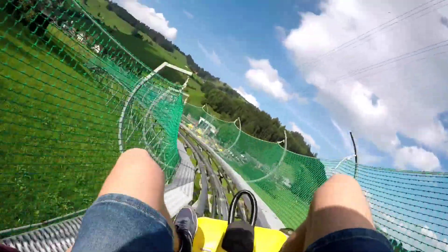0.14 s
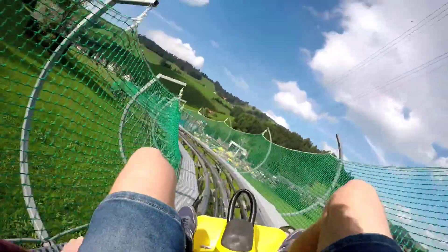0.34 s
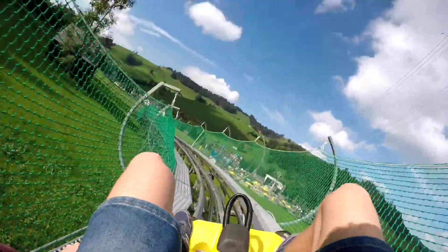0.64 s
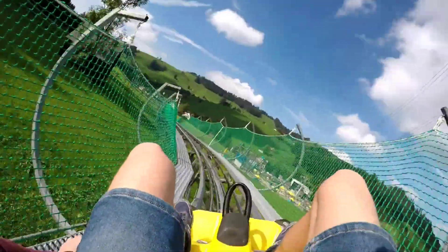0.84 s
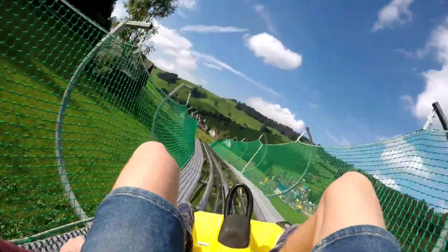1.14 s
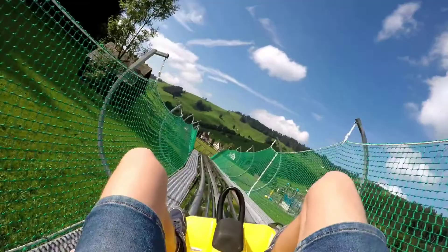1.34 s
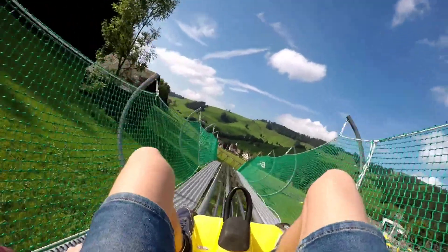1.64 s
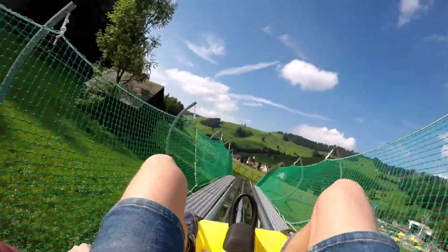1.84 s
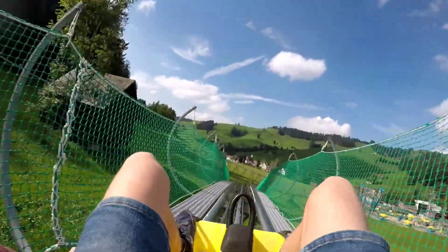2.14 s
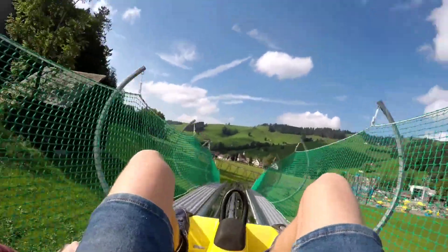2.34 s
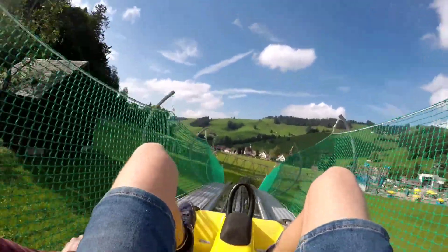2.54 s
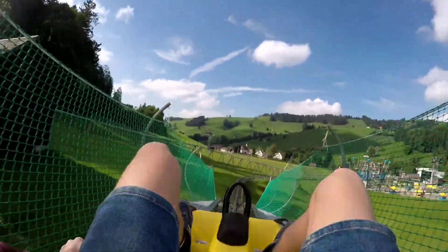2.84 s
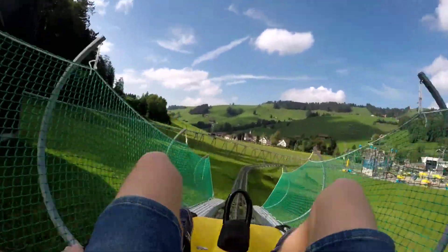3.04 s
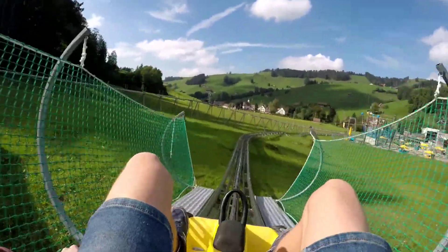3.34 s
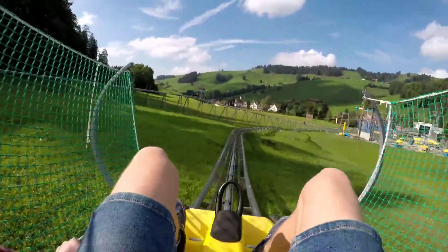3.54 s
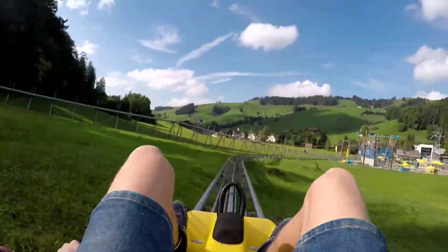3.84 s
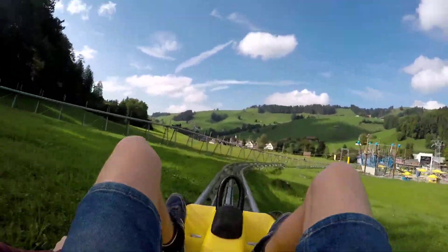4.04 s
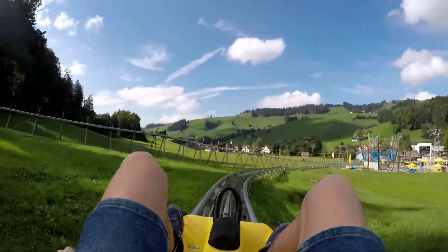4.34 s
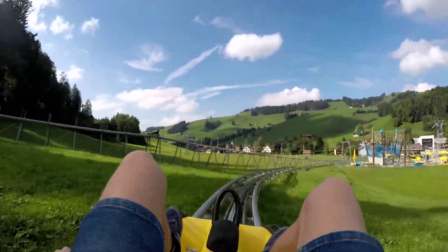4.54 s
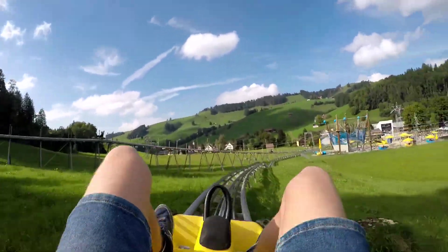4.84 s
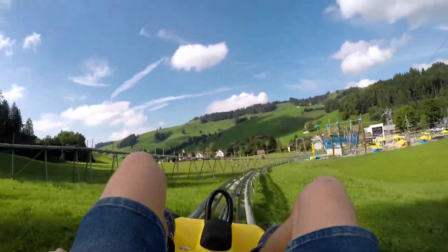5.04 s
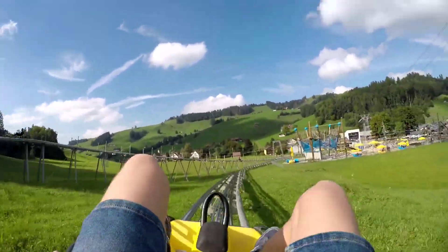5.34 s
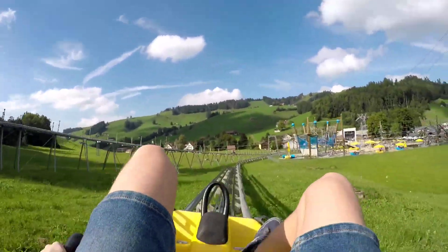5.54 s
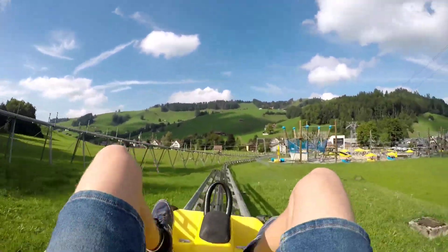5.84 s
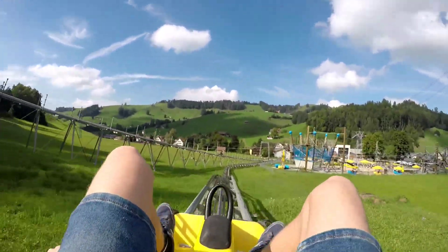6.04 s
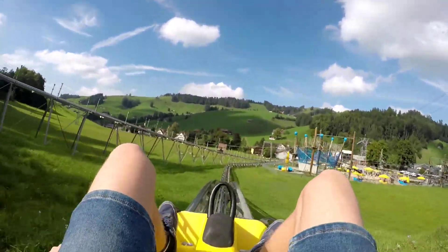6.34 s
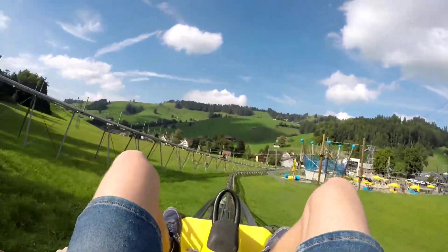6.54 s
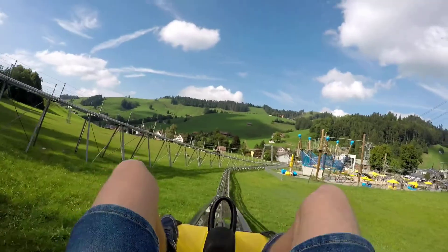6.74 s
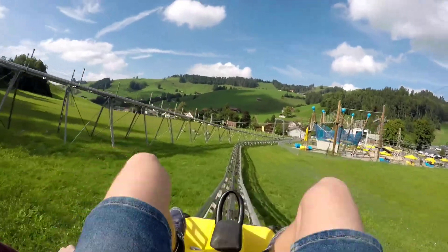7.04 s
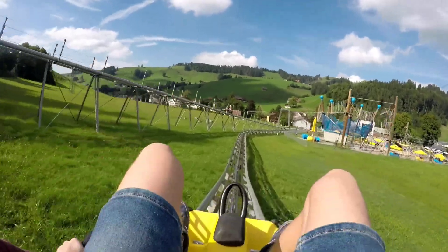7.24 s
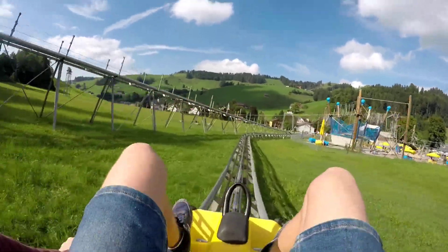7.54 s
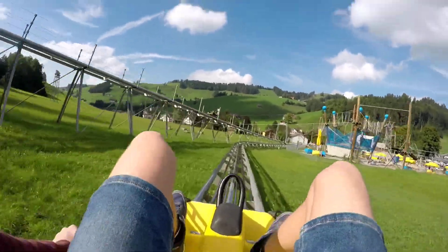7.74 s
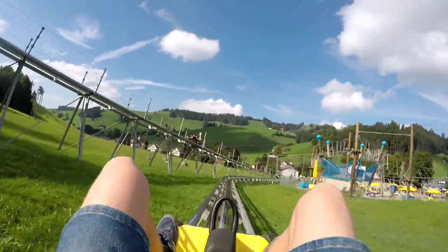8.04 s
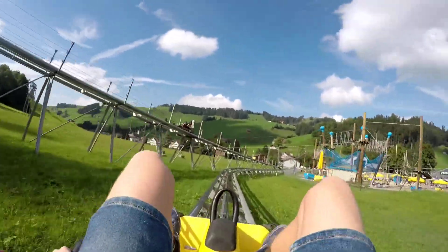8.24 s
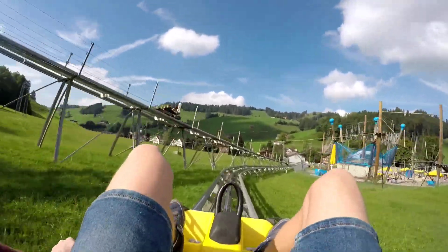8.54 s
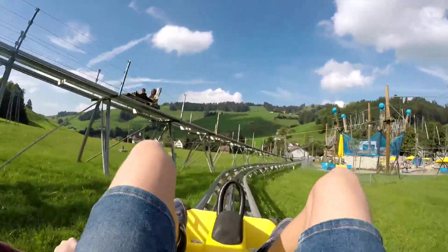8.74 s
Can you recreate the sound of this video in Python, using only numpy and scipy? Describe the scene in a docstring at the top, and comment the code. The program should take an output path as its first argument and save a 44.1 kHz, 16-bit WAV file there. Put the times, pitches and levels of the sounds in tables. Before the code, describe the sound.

An onboard microphone in open air catches a plastic-bodied sled racing over a tubular steel track. The uneven rumble swells with every rough stretch, with wavering booms, fine rattling and thin hiss on top. Quick wheel taps build before a cluster of knocks and scuffs at about three seconds; scattered clacks and heavy bumps carry on to the end under low wind thuds.

```python
"""A heavy jolt booms at once under a drumming, rattling ride: a coaster sled on a steel tube track, from the seat.
Random wheel contacts drum through resonances of frame and plastic shell; loose fittings chatter and knock
as filtered contacts and struck modes. Guide wheels scuff, hiss and squeak as filtered noise, the tube rings,
a wheel taps on every turn, and shaped noise makes the airstream that buffets the microphone."""
import sys
import numpy as np
from scipy import signal
from scipy.fft import rfft, irfft
from scipy.io import wavfile
from scipy.ndimage import uniform_filter1d

SR = 44100
rng = np.random.default_rng(int(sys.argv[2]) if len(sys.argv) > 2 else 0)


def store_wav(level_fs):
    """Save 16-bit WAV to argv[1]."""
    pcm = np.round(np.clip(np.atleast_2d(level_fs), -1, 1) * 32767)
    wavfile.write(sys.argv[1], SR, pcm.T.astype(np.int16))


N = 392490

# ringing modes of the loose fittings: pitch_hz [Hz], relative level_db [dB], t60_s [s]
FITTING_MODES = [(571, 7.5, 0.015), (725, 4.5, 0.015), (1048, -7, 0.04), (1296, 3, 0.014), (1523, 5, 0.012),
                 (1686, -4.5, 0.0087), (1903, -6.5, 0.022), (2670, -2, 0.0071)]
# colour of friction and cracks on steel: frequency_hz [Hz], relative density_db [dB per Hz]
STEEL_COLOUR = [(500, 12), (4500, 0.5), (5700, -5), (7500, -6.5), (10000, -16), (11500, -27.5),
                (15000, -40.5)]


def from_db(db):
    """Decibels to gain."""
    return 10 ** (np.asarray(db) / 20)


def rms_one(x):
    """Scale to an rms of one."""
    return x / np.sqrt(np.mean(x ** 2) + 1e-20)


def peak_one(x):
    """Scale to a peak of one."""
    return x / (np.abs(x).max() + 1e-20)


def in_time(rows):
    """Draw each column of a breakpoint curve at every sample."""
    s, *columns = np.transpose(rows)
    return [np.interp(np.arange(N) / SR, s, column) for column in columns]


def add(out, s, sound):
    """Mix a sound in, starting at second s."""
    at = int(np.clip(s * SR, 0, N - 1))
    out[at:at + len(sound)] += sound[:N - at]


def drift(rate_hz):
    """Random movement with an rms of one, weaker above rate_hz."""
    hz = np.arange(N // 2 + 1) * SR / N
    spectrum = rfft(rng.standard_normal(N)) / (1 + (hz / rate_hz) ** 2)
    return rms_one(irfft(spectrum, N))


def colour(x, spectrum, size=16384):
    """Causal (minimum-phase) filter that follows a spectrum; white noise keeps its level."""
    hz, db = np.transpose(spectrum)
    grid = np.maximum(np.arange(size // 2 + 1) * SR / size, 1)
    cepstrum = irfft(np.log(from_db(np.interp(np.log(grid), np.log(hz), db))))
    # folding the cepstrum forward in time gives the minimum phase
    folded = 2 * cepstrum[:size // 2] * (np.arange(size // 2) > 0)
    response = irfft(np.exp(rfft(folded, size)))
    return signal.fftconvolve(x, response / np.linalg.norm(response))[:N]


def resonate(x, hz, width_hz):
    """One resonance with a gain of one on top."""
    r = np.exp(-np.pi * width_hz / SR)
    zeros = np.array([1, 0, -1]) * (1 - r * r) / 2
    poles = [1, -2 * r * np.cos(2 * np.pi * hz / SR), r * r]
    return signal.lfilter(zeros, poles, x)


def band(x, low_hz, high_hz):
    """Band-pass."""
    edges = [low_hz, min(high_hz, SR / 2 - 1)]
    return signal.sosfilt(signal.butter(2, edges, "band", fs=SR, output="sos"), x)


def ring(t, hz, t60):
    """A struck mode: a sine that falls 60 dB in t60 seconds."""
    return np.sin(2 * np.pi * hz * t) * from_db(-60 * t / t60)


def contacts(per_s, spread_db):
    """Random small impacts of uneven size and either sign; rms one."""
    sizes = from_db(spread_db * np.minimum(rng.standard_normal(N), 2))
    signed = sizes * rng.choice([-1, 1], N)
    return rms_one(signed * (rng.random(N) < per_s / SR))


def steadied(x, span_s):
    """Even out slow swells and keep the quick ones."""
    power = np.abs(uniform_filter1d(x * x, int(span_s * SR) + 1))
    return x / np.sqrt(power + 1e-6)


def drummed(road, resonances, low_hz, high_hz):
    """A body shaken by the wheels answers in its resonances."""
    body = sum(from_db(db) * resonate(road, hz, width) * (-1) ** k
               for k, (hz, width, db) in enumerate(resonances))
    return steadied(band(body, low_hz, high_hz), span_s=0.23)


def tube_ring(friction, ring_db, width_hz):
    """Friction stirs the close, narrow modes of the steel tube."""
    # modes of the tube: pitch_hz [Hz]
    tube_modes = [2950, 3202, 3458, 3573, 3738, 3956, 4133, 4851]
    return friction + from_db(ring_db) * sum(resonate(friction, hz, width_hz) for hz in tube_modes)


def tapped(touch, tap_s):
    """Each touch is a brief chatter with its own mix of the modes of the fittings."""
    taps = signal.lfilter([1], [1, -np.exp(-1 / (tap_s * SR))], touch + 1e-18)
    # a mode that dies in t60 is ln(1000) / (pi t60) wide
    rung = sum(from_db(db) * resonate(taps * rng.standard_normal(N), hz, np.log(1000) / (np.pi * t60))
               for hz, db, t60 in FITTING_MODES)
    soft = signal.sosfilt(signal.butter(6, 1950, fs=SR, output="sos"), rung)
    return band(soft, low_hz=1120, high_hz=2600)


def jolts():
    """Each rough stretch swells, holds and lets go, raising rolling noise and buffeting (dB)."""
    # rough rail: start_s of the hold [s], length_s [s], roll_rise_db [dB],
    # buffet_rise_db [dB; below zero adds nothing]
    rough_stretches = [(0.004, 0.057, 7.5, 14), (0.323, 0.39, 2, 6), (1.198, 0.15, 4, -2.5),
                       (1.819, 0.069, 7, 9), (2.441, 0.55, 4, 6), (3.341, 0.21, 2.5, 8),
                       (3.877, 0.14, 5, 4), (4.642, 0.13, 4.0, 0), (4.864, 0.14, 4.5, 5),
                       (5.22, 0.63, 3, 1.5), (6.07, 0.7, 1.5, 3.5), (6.908, 0.47, 3, 5),
                       (7.858, 0.15, 8, 1.5), (8.465, 0.11, 3, 4)]
    attack_s, release_s = 0.034, 0.028
    t, rises = np.arange(N) / SR, np.zeros((2, N))
    for s, length, roll_db, buffet_db in rough_stretches:
        inside = np.minimum((t - s) / attack_s, (s + length - t) / release_s)
        shape = np.clip(1 + inside, 0, 1)
        rises = np.maximum(rises, np.outer([roll_db, buffet_db], shape))
    return rises


def airstream():
    """Lumpy turbulence at the microphone: deep coloured noise."""
    # turbulence colour: frequency_hz [Hz], relative density_db [dB per Hz]
    wind_colour = [(10, -9.5), (24, 1), (38, -5), (53, -0.5), (70, -6), (95, -8), (150, -28.5),
                   (1500, -95.5)]
    return steadied(colour(rng.standard_normal(N), wind_colour), span_s=0.27)


def rail_hiss(rattle_db, shake):
    """The treads hiss on the steel, more where the ride is rough."""
    # tread noise colour: frequency_hz [Hz], relative density_db [dB per Hz]
    hiss_colour = [(1200, -19.5), (2300, -0.5), (4800, -1), (5600, -9.5), (6600, -3.5), (8200, -6.5),
                   (10200, -15), (11300, -23.5), (15000, -32.5)]
    swell_db = 0.61 * (rattle_db - np.mean(rattle_db)) + 1.1 * shake + 2.15 * drift(24)
    return from_db(-53.0 + swell_db) * colour(rng.standard_normal(N), hiss_colour)


def squeaks():
    """A slipping tread sings for a moment on one narrow mode; the first row is instead the struck tube ringing
    on after the clang."""
    # squeaks: peak_s [s], level_db [dB], pitch_hz [Hz], width_hz [Hz]; the first row is the tube still ringing
    # after the clang
    squeak_rows = [(0.355, -42, 2900, 120), (0.378, -42, 4600, 350), (0.426, -45, 4350, 400),
                   (6.63, -43.5, 4480, 450)]
    half_length_s = 0.02
    out, t = np.zeros(N), np.arange(N) / SR
    for s, db, hz, width in squeak_rows:
        tone = rms_one(resonate(rng.standard_normal(N), hz, width))
        out += from_db(db) * np.exp(-((t - s) / half_length_s) ** 2) * tone
    return out


def scuffs():
    """Grainy friction that swells and dies as a guide wheel slides on the tube."""
    # slides: peak_s [s], relative level_db [dB], rise_s [s], fall_s [s]
    scuff_rows = [(0.26, -29, 0.0067, 0.046), (0.38, -39.5, 0.04, 0.045), (0.69, -45, 0.089, 0.11),
                  (1.3, -39.5, 0.09, 0.098), (2.89, -39, 0.043, 0.044), (3.015, -37, 0.0037, 0.0093),
                  (3.162, -35.5, 0.0054, 0.015), (3.486, -26, 0.005, 0.0098), (3.51, -46, .008, 0.16),
                  (6.63, -50, 0.19, 0.27), (7.366, -42.5, .004, 0.051), (8.0, -50.5, 1, 0.069)]
    t, power = np.arange(N) / SR, np.zeros(N)
    for s, db, rise, fall in scuff_rows:
        away = np.maximum((s - t) / rise, (t - s) / fall)
        power += (from_db(db) * np.exp(-np.minimum(away, 20))) ** 2
    grains = contacts(per_s=8000, spread_db=2.5) * from_db(4.2 * drift(71))
    return np.sqrt(power) * steadied(colour(grains, STEEL_COLOUR), span_s=0.27)


def ticks():
    """Small steel parts touch: a very short burst of bright noise."""
    # ticks: start_s [s], peak_db [dB]
    tick_rows = [(5.057, -20.5)]
    out, t = np.zeros(N), np.arange(SR // 50) / SR
    for s, db in tick_rows:
        burst = rng.standard_normal(len(t)) * np.exp(-t / 0.00065)
        add(out, s, from_db(db) * peak_one(band(burst, low_hz=4240, high_hz=8400)))
    return out


def clang():
    """A hard touch sets the tube ringing: two brief bright modes and a faint one that lingers."""
    # struck modes of the tube: pitch_hz [Hz], relative level_db [dB], t60_s [s]
    clang_modes = [(2960, -16, 0.45), (3240, -1, 0.064), (3580, 3, 0.045)]
    start_s, level_db = 0.2595, -21
    out, t = np.zeros(N), np.arange(SR // 2) / SR
    rung = sum(from_db(db) * ring(t, hz, t60) for hz, db, t60 in clang_modes)
    add(out, start_s, from_db(level_db) * rung * (1 - np.exp(-t / 0.003)))
    return out


def tread_taps(first, second):
    """Two uneven spots, half a turn apart, strike the rail on every turn of the wheel."""
    turns_per_s, level_db = 19.21, -39.5
    touch = np.zeros(N)
    at = np.arange(0, N, SR / turns_per_s / 2).astype(int)
    touch[at[::2]] = first[at[::2]]
    touch[at[1::2]] = second[at[1::2]]
    strength = np.sqrt(np.mean(touch[at] ** 2))
    return from_db(level_db) * strength * rms_one(tapped(touch, tap_s=0.0031))


def clacks(shake):
    """Light taps of the fittings run on all the time, in clusters where the sled shakes."""
    touch = np.abs(contacts(per_s=150, spread_db=6)) * from_db(2 * shake)
    return steadied(tapped(touch, tap_s=0.0017), span_s=0.12)


def chatter(shake):
    """Play in the wheel carriers: clusters of fine contacts that stir now one register, now another."""
    # contact colour: frequency_hz [Hz], relative density_db [dB per Hz]
    chatter_colour = [(300, -16.5), (550, 1), (700, 2), (920, -4), (1250, -4), (1550, -7.5), (1920, -11),
                      (2250, -25), (3200, -20.5), (12000, -68.5)]
    grit = contacts(per_s=2200, spread_db=-1.5) * from_db(3.2 * shake)
    edges_hz = np.geomspace(350, 4000, num=7)
    stirred = np.zeros(N)
    for k, (low, high) in enumerate(zip(edges_hz, edges_hz[1:])):
        stirred += band(grit, low, high) * from_db(2.3 * drift(59)) * (-1) ** k
    return steadied(colour(stirred, chatter_colour), span_s=0.36)


def roars(shake):
    """Coarse rail stirs a broad, hollow resonance of the shell whose centre keeps moving."""
    # roars: peak_s [s], level_db [dB], half_length_s [s]
    roar_rows = [(0.985, -30, 0.31), (2.85, -27, .03), (3.325, -27.5, 0.025), (7.0, -40.5, 0.3)]
    centre_hz, width_hz, wander = 630, 350, .16   # wander: share by which the centre moves
    n = np.arange(N)
    road = rng.standard_normal(N) * from_db(2 * shake)
    hollow = band(resonate(road, centre_hz, width_hz), centre_hz / 2, centre_hz * 2)
    # reading at an uneven speed moves the pitch
    moving = np.interp(n + wander * np.cumsum(drift(12)), n, hollow, period=N)
    swell = sum(from_db(db) * np.exp(-((n / SR - s) / half) ** 2) for s, db, half in roar_rows)
    return rms_one(moving) * swell


def surges():
    """The rolling wheels catch a resonance of shell or frame: a wavering tone swells and fades."""
    # surges: peak_s [s], level_db [dB rms at the peak], pitch_hz [Hz, before wavering]
    surge_rows = [(0.493, -18, 390), (0.586, -10, 122), (0.661, -19, 394), (0.862, -15, 249.7),
                  (2.79, -18, 380), (2.862, -16, 399), (4.042, -16, 204.9), (6.642, -11, 133.7),
                  (7.124, -16, 207.3), (7.29, -18, 162), (7.94, -11.5, 210)]
    half_length_s, wander = 0.02, 0.05046   # wander: share by which the pitch wavers
    out, t = np.zeros(N), np.arange(N) / SR
    wavering_t = t + wander * np.cumsum(drift(48.0)) / SR
    for s, db, hz in surge_rows:
        near = np.abs(t - s) < .15
        swell = from_db(db) * np.exp(-((t[near] - s) / half_length_s) ** 2)
        out[near] += swell * np.sqrt(2) * np.sin(2 * np.pi * hz * wavering_t[near])
    return out


def bumps():
    """A bump in the rail jolts the shell: a soft-edged blow on one decaying mode."""
    # blows: start_s [s], peak_db [dB], pitch_hz [Hz], t60_s [s]
    bump_rows = [(0.036, -10.5, 190, 0.42), (1.816, -12.5, 256, 0.046), (1.872, -17.5, 970, 0.017),
                 (2.16, -5.5, 147, 0.055), (2.445, -6.5, 123.6, 0.27), (2.633, -11.5, 352, 0.086),
                 (2.915, -14.5, 824, 0.026), (3.291, -15, 646, 0.067), (3.515, -10, 200, 0.14),
                 (4.333, -5.5, 148, 0.046), (4.428, -6.5, 198, 0.022), (7.081, 4.5, 176, 0.011),
                 (7.848, -4.5, 422, 0.023), (7.845, -8, 219, 0.068)]
    out, t = np.zeros(N), np.arange(SR // 4) / SR
    for s, db, hz, t60 in bump_rows:
        blow = ring(t, hz, t60) * (1 - np.exp(-t / 0.0015))
        add(out, s, from_db(db) * peak_one(blow))
    return out


def knocks():
    """Each knock strikes a slightly different fitting and bounces once; a hard edge adds a brief crack."""
    # knocks: start_s [s], then relative levels body_db, thud_db (low modes), crack_db (hard edge) [dB]
    knock_rows = [(0.1381, -18.5, -20, -50), (0.475, -20, -23, -39), (1.5, -20.5, -27, -50),
                  (2.897, -14.5, -15, -41), (2.9157, -21, -7.5, -47), (2.9542, -16.5, -10.5, -31),
                  (2.9624, -18, -16, -33), (3.069, -20, -17, -46), (3.303, -32, -25, -44),
                  (3.323, -25, -19, -46), (3.333, -23, -28, -35.5), (3.3533, -20, -26, -46),
                  (3.3788, -14.5, -18, -45), (3.3908, -19, -13, -35), (3.483, -11, -11, -34),
                  (3.508, -19, -15, -26), (3.564, -25, -21, -39), (3.721, -30, -16.5, -55),
                  (3.8177, -13.5, -24.5, -35), (3.863, -23, -40, -37), (4.0346, -20.5, -16, -35.5),
                  (4.1943, -18, -18.5, -60), (4.343, -23, -12, -53), (4.4658, -18.5, -19, -42),
                  (4.559, -18, -21, -38), (4.6394, -14.5, -28, -39), (4.751, -23, -13, -47),
                  (4.8471, -16, -16.5, -39), (4.927, -19, -23, -32), (4.9899, -13, -21, -37),
                  (5.236, -23, -16, -39), (5.3142, -21.5, -17, -45), (5.4585, -21.5, -15, -45),
                  (5.473, -20.5, -13.5, -41), (5.678, -21, -22, -49), (5.6958, -20.5, -18.5, -33),
                  (5.8213, -20, -22, -48), (5.838, -22, -15, -38), (5.8504, -19, -18, -34.5),
                  (5.9145, -23, -15, -40), (5.926, -36, -15, -38), (5.9455, -17.5, -25, -34.5),
                  (6.394, -14.5, -22, -38), (6.503, -21.5, -20, -40), (6.552, -17, -17, -51),
                  (6.732, -24, -25, -35), (6.8525, -20, -17.5, -51), (7.206, -21, -41, -45),
                  (7.366, -19, -12.5, -27), (7.3958, -18, -19, -42), (7.415, -21.5, -12, -38),
                  (7.472, -22.5, -32, -57), (7.778, -25, -24, -52), (7.912, -25, -21, -48),
                  (7.97, -22, -18, -36), (8.033, -24, -22, -39), (8.0434, -28, -10.5, -36),
                  (8.055, -25, -13.5, -34), (8.244, -23, -22.5, -41), (8.351, -26, -24, -41),
                  (8.4322, -24.5, -20, -50), (8.5245, -19.5, -17.5, -30)]
    body_trim_db, thud_trim_db, crack_trim_db = 2.5, 2.5, 7.5
    detune = 0.042   # share by which the modes differ from one fitting to the next
    bodies, cracks, t = np.zeros(N), np.zeros(N), np.arange(SR // 20) / SR
    hz, mode_db, t60 = np.transpose(FITTING_MODES)[:, :, None]
    low = hz[:, 0] < 900
    for s, db, thud_db, crack_db in knock_rows:
        own_hz = hz * np.exp(detune * rng.standard_normal(hz.shape))
        gains = from_db(mode_db + rng.normal(0, 2, hz.shape)) * rng.choice([-1, 1], hz.shape)
        modes = gains * ring(t, own_hz, t60)
        modes *= 1 - np.exp(-t / 0.00085)   # the plastic gives a little
        body = from_db(db + body_trim_db) * peak_one(modes[~low].sum(0))
        body += from_db(thud_db + thud_trim_db) * peak_one(modes[low].sum(0))
        add(bodies, s, body)
        add(bodies, s + rng.uniform(0.00441, 0.013), from_db(-18.5) * body)   # the bounce
        crack = rng.standard_normal(len(t)) * np.exp(-t / 0.0036)
        add(cracks, s, from_db(crack_db + crack_trim_db) * crack)
    return bodies + colour(cracks, STEEL_COLOUR)


def rumble(boom_db, drone_db, shake):
    """The roughness of the rails drums through the wheels into frame and shell."""
    # resonances of the plastic shell: pitch_hz [Hz], width_hz [Hz], relative level_db [dB]
    shell_resonances = [(118, 36.8, -1), (153.8, 19.4, 1.5), (196.9, 50, -3.5)]
    # resonances of the wheel frame: pitch_hz [Hz], width_hz [Hz], relative level_db [dB]
    frame_resonances = [(296.4, 22.8, 1), (343.8, 31.5, -1), (396, 45, 1), (464, 300, -13)]
    road = contacts(per_s=900, spread_db=3.5) * from_db(2.0 * shake)
    boom = drummed(road, shell_resonances, low_hz=73, high_hz=299)
    drone = drummed(road, frame_resonances, low_hz=238, high_hz=803)
    return from_db(boom_db - 3) * boom + from_db(drone_db - 1) * drone


def scene():
    """Jolts raise wind, rumble and rattle; one quick random shake stirs these and the roars together."""
    # steady airstream at the microphone: time_s [s], relative level_db [dB]
    breeze = [(0.0, -25.5), (1.3, -20), (2.3, -25), (4.2, -20.5), (5.6, -18), (7.1, -21), (7.6, -14.5),
              (8.25, -19.5), (8.9, -18)]
    # smooth-rail levels as speed and load in the bends change:
    # time_s [s], relative boom_db of the shell, drone_db of the wheel frame, rattle_db [dB]
    ride = [(0.0, -21, -23.5, -34.5), (0.7, -18.5, -19.5, -34.5), (1.5, -21, -27.5, -35.5),
            (2.3, -20.5, -23.5, -36), (2.85, -23, -23, -40.5), (3.2, -19.5, -27.5, -37.5),
            (5.0, -23.0, -27.5, -36.5), (6.6, -19, -22.5, -35.5), (7.1, -18.5, -24.5, -43),
            (7.6, -17.5, -28.5, -43), (8.25, -23.5, -28.5, -37.5), (8.9, -16, -20.5, -34.5)]
    # taps of a loaded wheel: time_s [s], strengths first_tap and second_tap of two tread spots [0-1]
    bend = [(1.65, 0.6, 0.3), (1.9, 0.64, 0.77), (2.82, 1, 1), (2.95, .3, 0.31)]
    (air_db,), (boom_db, drone_db, rattle_db) = in_time(breeze), in_time(ride)
    first_tap, second_tap = in_time(bend)
    (jolt_db, buffet_db), shake = jolts(), drift(28)
    rattle_db = rattle_db + jolt_db

    wind = from_db(air_db + buffet_db + 2.1 * shake) * airstream()
    hiss = tube_ring(rail_hiss(rattle_db, shake), ring_db=-9.0, width_hz=16)
    scrape = tube_ring(from_db(7.0) * scuffs(), ring_db=-7.0, width_hz=31)
    free_play = 1 - .55 * first_tap   # the load in the bend holds part of the light taps still
    rattle = from_db(rattle_db - 0.5) * chatter(shake)
    rattle += from_db(rattle_db - 7) * free_play * clacks(shake)
    rolling = rumble(boom_db + jolt_db, drone_db + jolt_db, shake) + roars(shake)
    rolling += tread_taps(first_tap, second_tap) + rattle + hiss + scrape
    events = knocks() + bumps() + surges() + clang() + ticks() + squeaks()
    return (wind + rolling + events)[None]


def record(dry):
    """The highest peaks are rounded and the top is cut."""
    cutoff_hz = 15200
    rounded = dry / (1 + (dry / .95) ** 6) ** (1 / 6)
    return signal.sosfilt(signal.ellip(10, .1, 80, cutoff_hz, fs=SR, output="sos"), rounded)


dry = scene()
out = record(dry)
store_wav(out)
```